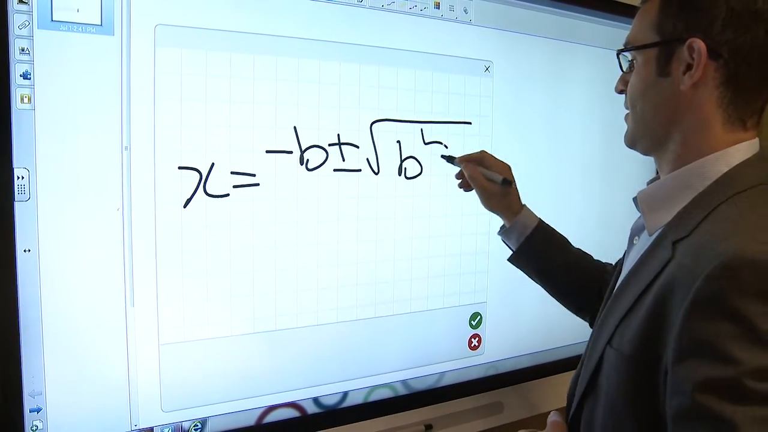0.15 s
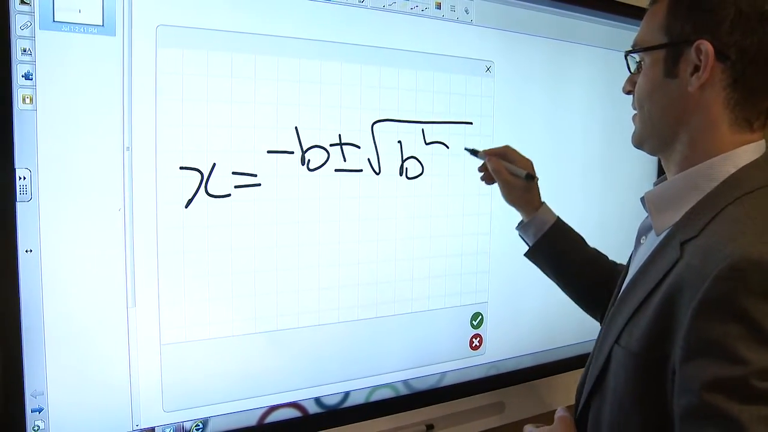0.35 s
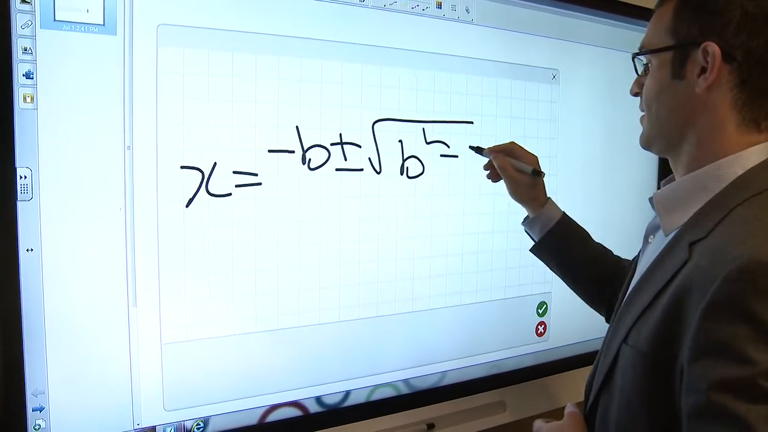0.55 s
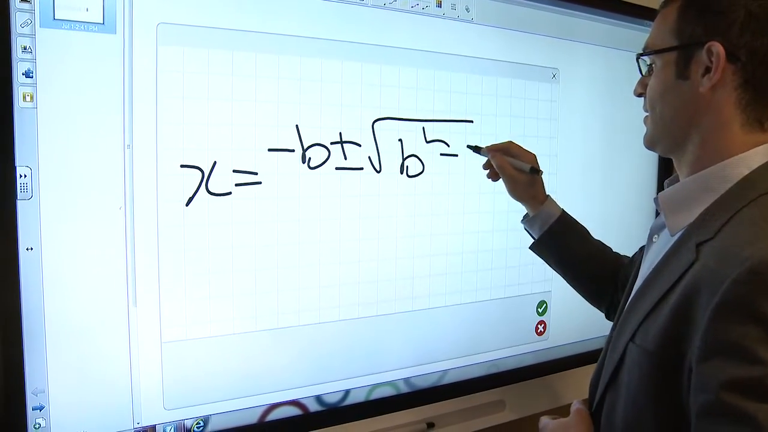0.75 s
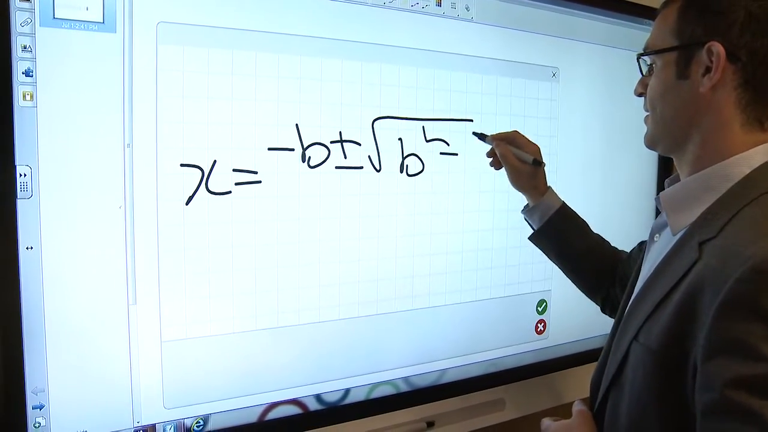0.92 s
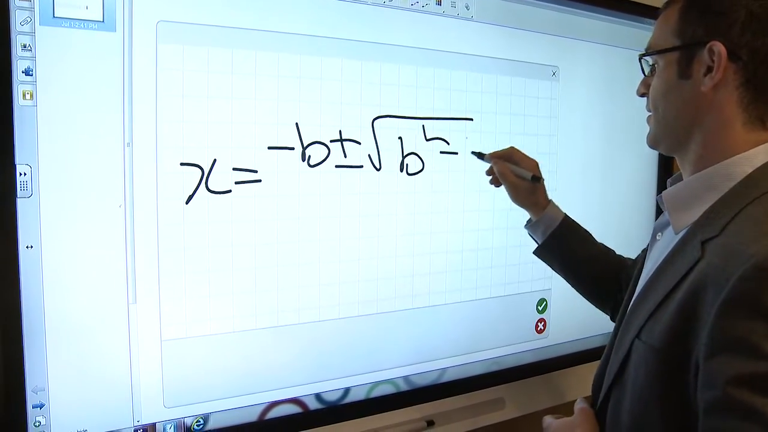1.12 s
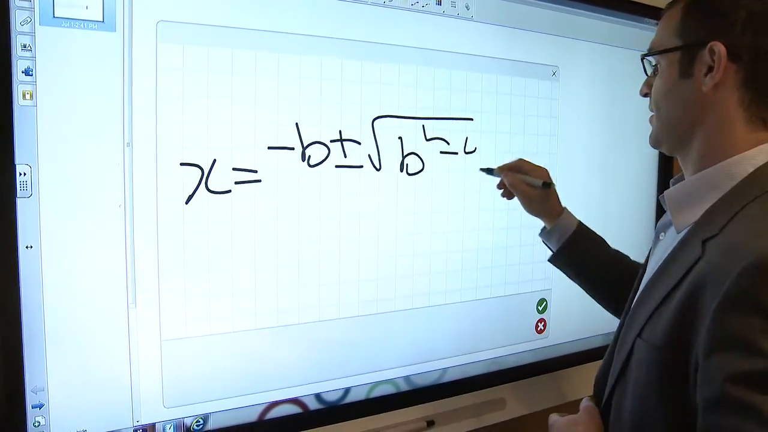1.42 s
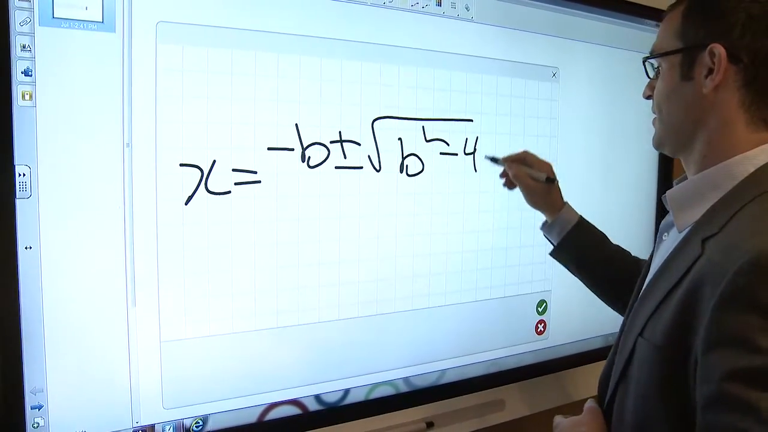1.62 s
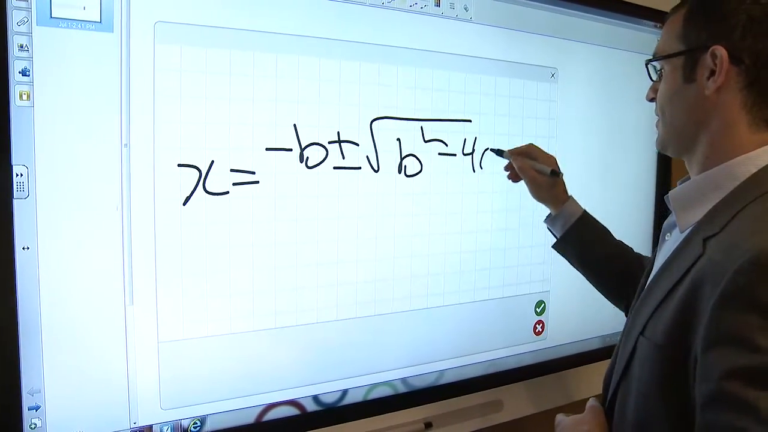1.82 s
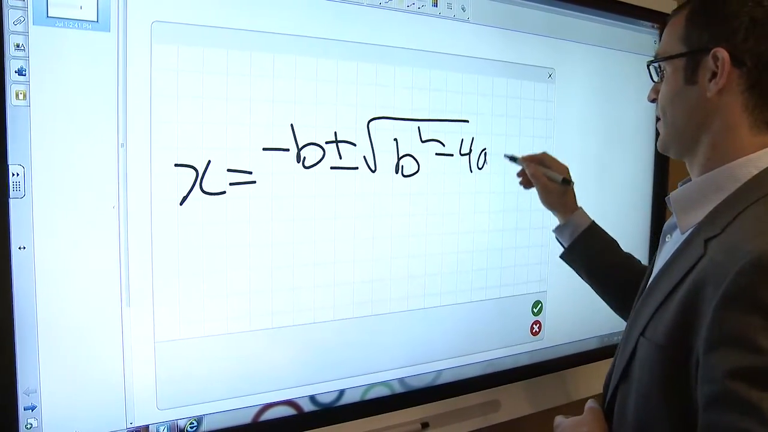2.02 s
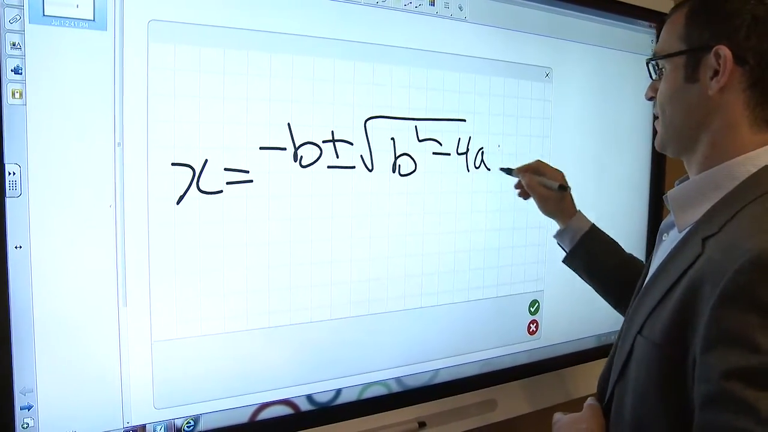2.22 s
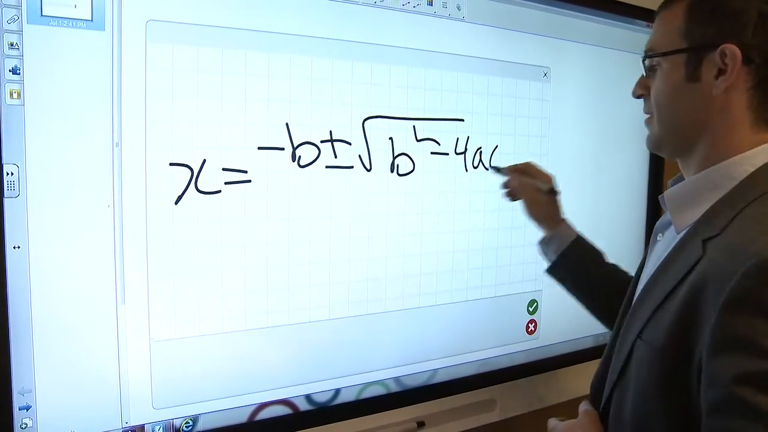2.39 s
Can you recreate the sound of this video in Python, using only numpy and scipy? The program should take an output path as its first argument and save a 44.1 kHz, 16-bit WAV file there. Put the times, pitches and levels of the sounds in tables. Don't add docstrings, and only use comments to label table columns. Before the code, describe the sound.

A stylus writing on a large glass display, hollow knocks and short scratchy strokes, quiet room

```python
import sys
import numpy as np
from scipy import signal
from scipy.fft import rfft, irfft, next_fast_len
from scipy.io import wavfile
from scipy.ndimage import uniform_filter1d, map_coordinates

SR = 44100
rng = np.random.default_rng(int(sys.argv[2]) if len(sys.argv) > 2 else 0)


def ratio(d):
    e = np.asarray(d, float) / 20
    return 10 ** e


def master(y):
    cut = np.clip(np.atleast_2d(y).T, -1, 1)
    pcm = np.round(cut * 32767)
    wavfile.write(sys.argv[1], SR, pcm.astype(np.int16))


N = 112454


def unit(x):
    return x / np.sqrt(np.mean(x ** 2) + 1e-20)


def along(points, hz):
    f, value = np.transpose(points)
    return np.interp(np.log(hz + 1), np.log(f + 1), value)


def wobble(rate):
    knots = rng.standard_normal(int(N / SR * 400))
    return map_coordinates(knots, [np.arange(N) * rate / SR])


def filtered(x, response):
    size = next_fast_len(len(x) + 8192)
    spectrum = rfft(x, size) * response(np.fft.rfftfreq(size, 1 / SR))
    return irfft(spectrum, size)[:len(x)]


def coloured(noise, colour):
    return unit(filtered(noise, lambda f: ratio(along(colour, f))))


def peak(f, hz, width):
    return 1j * f * width / (hz * hz - f * f + 1j * f * width)


def patchy(depth_db):
    z = signal.stft(rng.standard_normal(N), nperseg=512)[2]
    field = uniform_filter1d(rng.standard_normal(z.shape), size=7, axis=0)
    field = uniform_filter1d(field, size=4, axis=1)
    return signal.istft(z * ratio(depth_db * unit(field)), nperseg=512)[1][:N]


def soft_onset(t, rise_s):
    return 1 - np.exp(-(t / rise_s) ** 2)


def add(track, s, x):
    part = track[round(s * SR):][:len(x)]
    part += x[:len(part)]


TURNS = {"side": (50, 114), "middle": (275, 133)}


def panel_ring(t, modes, place, upper):
    upper_from_hz, contact_s = 240, .001
    align_s = .008
    first, step = TURNS[place]
    ring = np.zeros(len(t))
    for k, (hz, db, t60, way) in enumerate(modes):
        retuned = t + (upper - 1) * (hz > upper_from_hz) * (t - align_s)
        phase = np.radians(first + k * step)
        ring += way * ratio(db - 60 * t / t60) * np.sin(2 * np.pi * hz * retuned + phase)
    return ring * soft_onset(t, contact_s)


# Hz, dB per Hz.
FRAME = [(60, -56), (100, -16), (160, 3.5), (290, -1), (620, -1), (880, -23), (1500, -37.5), (2500, -56)]
AFTER = {"side": (-17, 0.32), "middle": (-11, .33)}


def frame_ring(t, place):
    db, t60 = AFTER[place]
    noise = coloured(rng.standard_normal(len(t)), FRAME)
    return noise * ratio(db - 60 * t / t60) * soft_onset(t, .022)


# Hz, dB per Hz.
TICK = [(800, 8.5), (1500, -5), (2500, -10), (4300, -15.5), (6000, -34), (10000, -35), (16000, -46)]


def tip_tick(t, tick_db, ping_db, upper):
    tick_t60_s, snap_t60_s, snap_db = 0.079, .015, 3
    ping_hz, ping_t60_s = 4256, 0.022
    fade = ratio(-60 * t / tick_t60_s) + ratio(snap_db - 60 * t / snap_t60_s)
    tick = coloured(rng.standard_normal(len(t)), TICK) * ratio(tick_db) * fade
    ping = ratio(ping_db - 60 * t / ping_t60_s) * np.sin(2 * np.pi * ping_hz * upper * t)
    return soft_onset(t, .0004) * (tick + ping)


def knock(modes, place, db, tick_db, ping_db, upper=1):
    t = np.arange(SR // 2) / SR
    ring = ratio(db) * panel_ring(t, modes, place, upper)
    tick = tip_tick(t, tick_db, ping_db, upper)
    return room(ring + tick) + ratio(db) * frame_ring(t, place)


# start in seconds, peak in dB, tick in dB, tip ping in dB.
FIRST_TAP = (.2132, -11.5, -35.5, -56)
# start in seconds, peak in dB, tick in dB, tip ping in dB,
# pitch factor of the upper modes.
TAPS = [
    (1.0199, -11, -35, -48, 1),
    (1.3157, -15, -46, -62, 1.013),
    (1.6007, -14.5, -48, -58, 1.065),
    (2.1404, -16, -47, -54, 1.07),
]
# Hz, level in dB, t60 in seconds, direction (+1 or -1) at the tip.
PANEL = [(175, -7, .09, 1), (222, 0, .1, 1), (256, -1, .034, 1), (337, -7, .055, 1), (409, -1, .06, 1),
         (580, -21, .18, -1), (790, -21, .05, -1)]
# Hz, level in dB, t60 in seconds, direction at the tip.
PANEL_MIDDLE = [(178, -7, .15, 1), (240, -10, .2, 1), (277, -8, .14, 1), (371, -9, .115, 1),
                (410, -5, .09, 1), (508, -9, .12, -1), (662, -18, .09, -1), (880, -15, .035, 1)]


def taps():
    out = np.zeros(N)
    start, *how = FIRST_TAP
    add(out, start, knock(PANEL_MIDDLE, "middle", *how))
    for start, *how in TAPS:
        add(out, start, knock(PANEL, "side", *how))
    return signal.sosfilt(signal.butter(2, 90, "high", fs=SR, output="sos"), out)


# Hz, dB per Hz.
GLASS = [(1500, -15), (3000, -5.5), (6000, -6.5), (10000, -7), (14000, -5), (16000, -7)]
# Hz, width in Hz, level in dB.
PEN = [(4350, 920, 0.5), (7610, 1300, 4.5), (8730, 490, 5.5), (13500, 940, -13.5)]


def pen_on_glass(f):
    barrel = 1 + sum(ratio(db) * abs(peak(f, hz, width)) ** 2 for hz, width, db in PEN)
    return ratio(along(GLASS, f)) * (f > 1200) * barrel


# time in seconds, tip speed as dB.
STROKES = [
    [(0.0, -61), (0.03, -59), (0.056, -66), (0.066, -77), (0.09, -75)],
    [(0.225, -58), (0.235, -74), (0.269, -64.5), (0.305, -59), (0.335, -65), (0.38, -93)],
    [(1.03, -75), (1.08, -67), (1.13, -71), (1.194, -67), (1.244, -96), (1.25, -71)],
    [(1.328, -62), (1.342, -78), (1.376, -66), (1.41, -63.5), (1.45, -70), (1.468, -83), (1.5, -81)],
    [(1.604, -64), (1.854, -68.5), (1.885, -79.5)],
    [(1.885, -81), (1.907, -68), (1.967, -65.5), (1.997, -74.5), (2.029, -92), (2.04, -77)],
    [(2.146, -65), (2.162, -70.5), (2.31, -60), (2.366, -87), (2.38, -76)],
]
# low register in dB, top register in dB.
SLANTS = [(-1, -6), (0.5, -1), (0.5, 2), (0.5, 2), (0, -1), (1, 5.5), (-0.5, 2.5)]


def strokes():
    rub_db, pivot_db = 2, -60.5
    low_grows, middle_grows, top_grows = 0.31, 0.96, 1.2
    t, speed_db = np.arange(N) / SR, np.full(N, -120.)
    for rows in STROKES:
        s, db = np.transpose(rows)
        speed_db = np.maximum(speed_db, np.interp(t, s, db, left=-120, right=-120))
    speed_db = 20 * np.log10(uniform_filter1d(ratio(speed_db), size=200) + 1e-6)
    starts = [rows[0][0] for rows in STROKES]
    low_db, top_db = np.transpose(SLANTS)[:, np.searchsorted(starts, t, "right") - 1]
    touching = np.clip((speed_db + 91.5) / 12, 0, 1)

    grain_db = 0.5 * wobble(250) + 1.5 * wobble(45.02)
    rub = unit(filtered(patchy(0.5) * ratio(grain_db), pen_on_glass))
    low = filtered(rub, lambda f: 1 / (1 + (f / 5800) ** 8))
    top = filtered(rub, lambda f: 1 - 1 / (1 + (f / 10500) ** 8))
    middle = rub - low - top

    def lift(grows):
        return touching * ratio(rub_db + pivot_db + grows * (speed_db - pivot_db))

    out = lift(low_grows) * ratio(low_db) * low
    out += lift(middle_grows) * middle
    return out + lift(top_grows) * ratio(top_db) * top


# start in seconds, peak in dB, pitch in Hz.
BUMPS = [
    (.56, -57, 170),
    (2.235, -32.5, 96),
    (2.248, -40, 197),
    (2.344, -39, 142),
    (2.381, -32.5, 164.6),
    (2.395, -31, 161),
    (2.424, -31, 165),
    (2.438, -39.5, 343),
    (2.46, -48, 607),
]


def bumps():
    t60_s, rise_s, scuff_db = 0.1, 0.0045, -9
    out, t = np.zeros(N), np.arange(SR // 2) / SR
    for start, db, hz in BUMPS:
        scuff = unit(filtered(rng.standard_normal(len(t)), lambda f: peak(f, 440, 450) ** 3))
        push = ratio(scuff_db) * scuff - np.sin(2 * np.pi * hz * t)
        add(out, start, room(ratio(db - 60 * t / t60_s) * soft_onset(t, rise_s) * push))
    return out


# start in seconds, rise in seconds, fall in seconds, level in dB.
SLEEVE = [(6, 0.15, 0.03, -48), (.55, 0.2, 0.12, -72)]
# Hz, dB per Hz.
CLOTH = [(100, -17), (300, -22), (700, -5), (1500, -9), (3000, -20), (6000, -35), (15000, -38)]
# start in seconds, rise in seconds, level in dB.
SWISH = (2.24, 0.15, -69)


def sleeve():
    clock, rustle = np.arange(N) / SR, np.zeros(N)
    for start, rise, fall, db in SLEEVE:
        since = np.clip(clock - start, 0, None)
        rustle += ratio(db) * soft_onset(since, rise) * np.exp(-since / fall)
    rustle = rustle * ratio(2.5 * wobble(40)) * coloured(patchy(3), CLOTH)
    start, rise, db = SWISH
    sweep = soft_onset(np.clip(clock - start, 0, None), rise)
    swish = unit(filtered(patchy(2.1), lambda f: peak(f, 3000, 9000)))
    return rustle + ratio(db) * sweep * swish


# Hz, dB per Hz.
AIR = [(12, -61), (20, -10.5), (162, -2), (344, -9), (454, -10), (1460, -29), (1640, -28), (2290, -34),
       (15700, -48)]
# Hz, width in Hz, level in dB.
DUCT = [(104.2, 43, -58.5), (186.6, 23, -59)]
# Hz, level in dB.
WHINE = [(2400, -85), (2640, -89), (2880, -88), (4000, -87)]


def air():
    out = ratio(-50) * coloured(patchy(0.9), AIR)
    for hz, width, db in DUCT:
        hum = unit(filtered(rng.standard_normal(N), lambda f: peak(f, hz, width) ** 2))
        out += ratio(db + 1.5 * wobble(3)) * hum
    for hz, db in WHINE:
        out += ratio(db) * np.sin(2 * np.pi * hz * np.arange(N) / SR)
    return out


# Hz, t60 in seconds.
ROOM = [(100, 0.36), (300, 0.36), (700, 0.41), (2000, 0.56), (8000, 0.17)]


def room(x):
    level_db, delay_s = -19, .015
    hz, t, z = signal.stft(rng.standard_normal(SR // 2), SR, nperseg=256)
    fade = ratio(-60 * t / along(ROOM, hz)[:, None])
    tail = signal.istft(z * fade, SR, nperseg=256)[1][:SR // 2]
    tail = tail * np.clip(np.arange(len(tail)) / SR / delay_s - 1, 0, 1)
    tail = tail / np.linalg.norm(tail)
    return x + ratio(level_db) * signal.fftconvolve(x, tail)[:len(x)]


def scene():
    return (taps() + strokes() + bumps() + sleeve() + air())[None]


def roll_off(x):
    return signal.sosfilt(signal.butter(12, 15810, fs=SR, output="sos"), x)


def record(dry):
    mix = filtered(dry[0], lambda hz: hz < 15790)[None]
    return roll_off(mix)


dry = scene()
out = record(dry)
master(out)
```